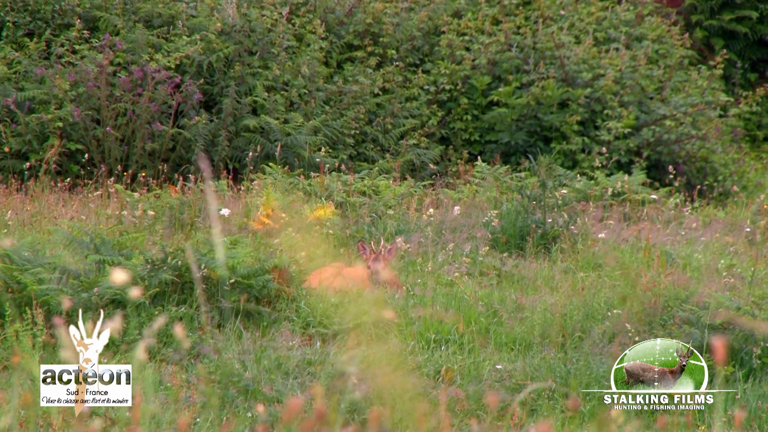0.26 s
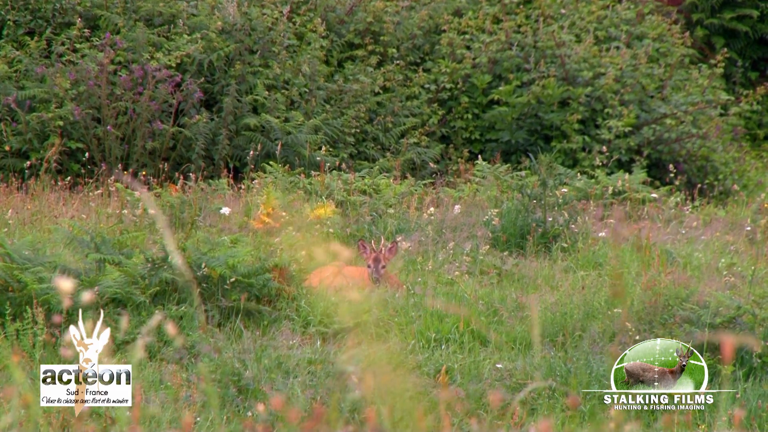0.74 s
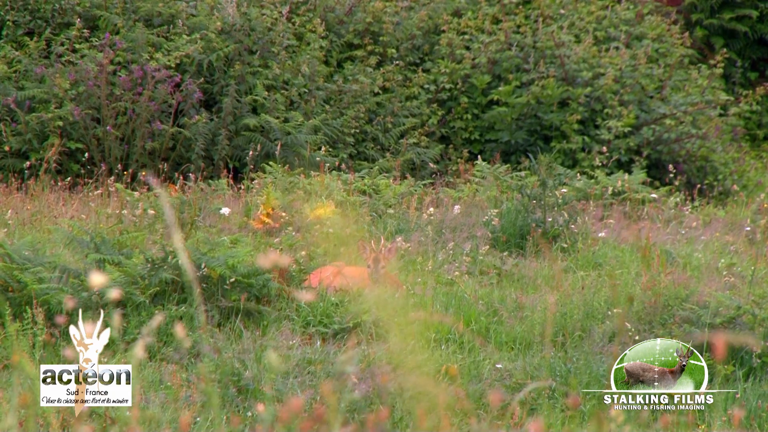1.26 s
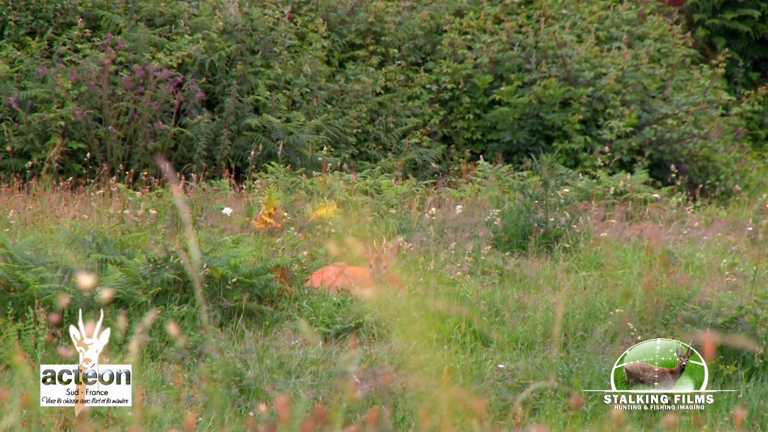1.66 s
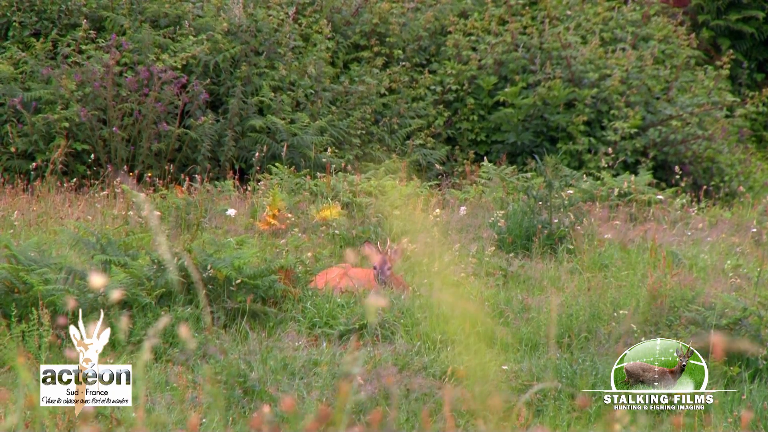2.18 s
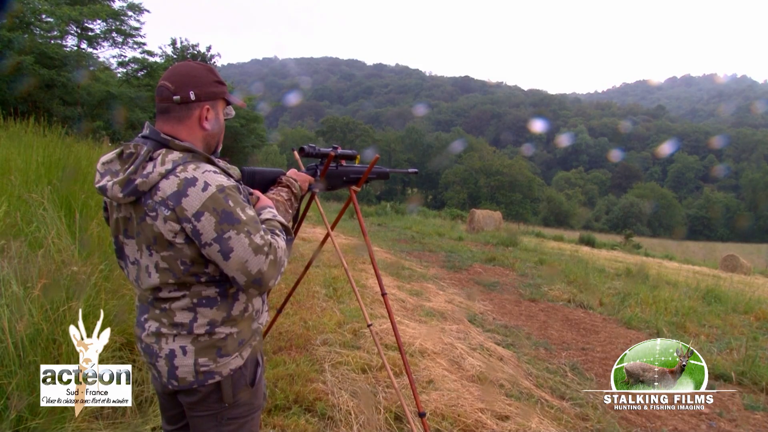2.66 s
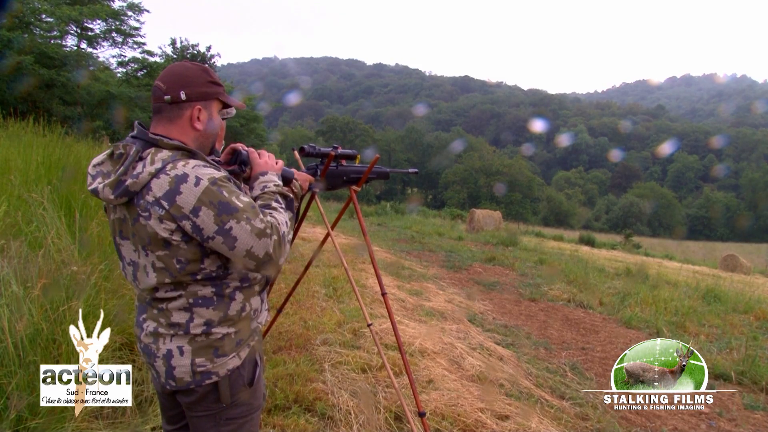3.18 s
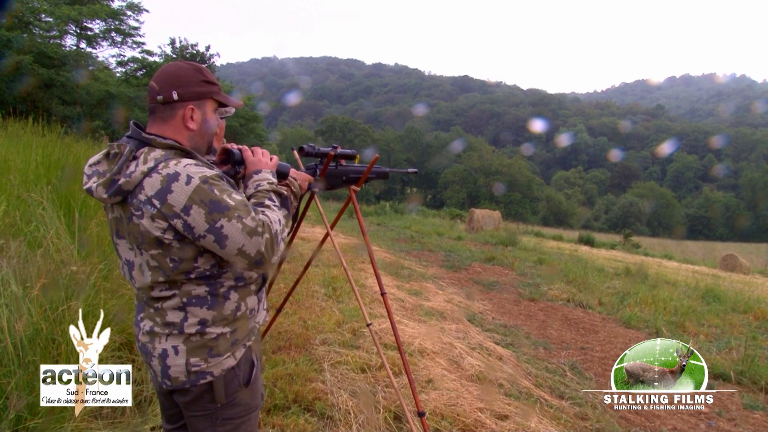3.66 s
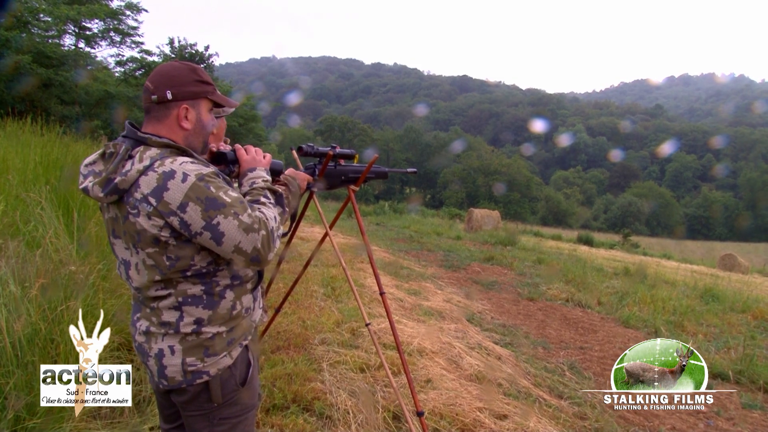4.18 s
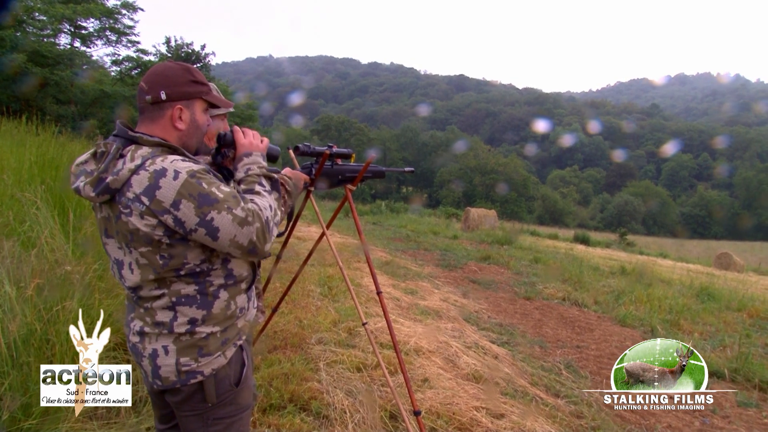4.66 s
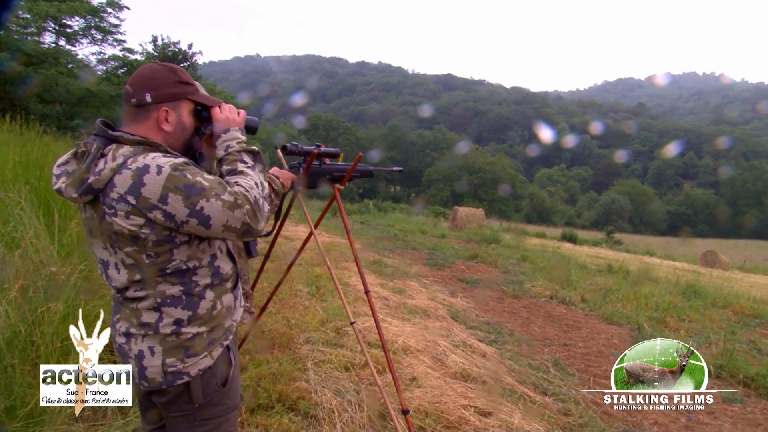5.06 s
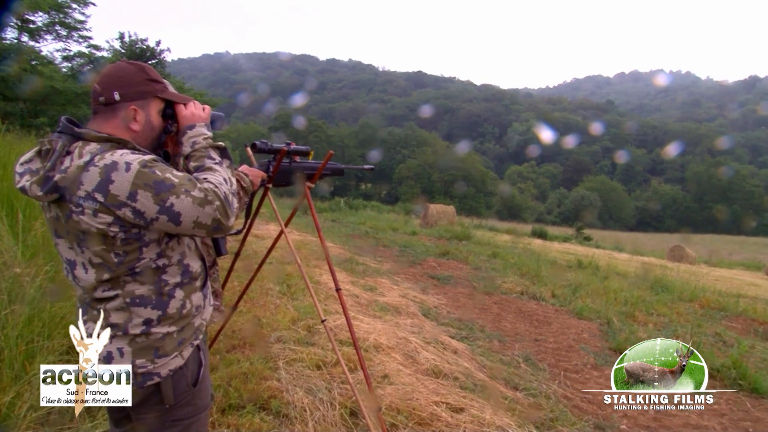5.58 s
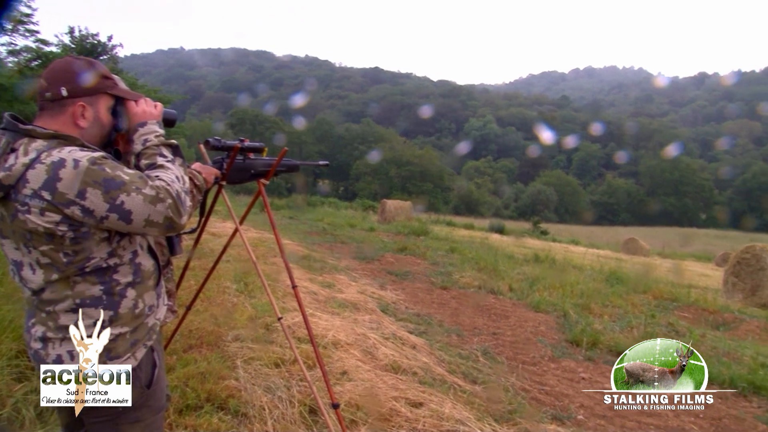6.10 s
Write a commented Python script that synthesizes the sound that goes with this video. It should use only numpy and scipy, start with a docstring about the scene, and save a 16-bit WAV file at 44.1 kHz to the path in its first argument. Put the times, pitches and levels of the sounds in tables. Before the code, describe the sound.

A deer barks twice in a meadow, then faint birds, soft drips and small knocks carry on over a low hush.

```python
"""A roe deer barks twice across a damp meadow while a warbler sings. Its vocal folds vibrate at a slow and
a fast rate at once; the two mix into extra tones over hoarse throat noise, shaped by one swell of effort.
Then the scene changes to a quieter field edge with far birds, one mewing call and soft knocks.
Drips, a small motor close by and a low hush of air are heard in both places."""
import sys
import numpy as np
from scipy import signal
from scipy.fft import rfft, irfft, next_fast_len
from scipy.io import wavfile

SR = 44100
rng = np.random.default_rng(int(sys.argv[2]) if len(sys.argv) > 2 else 0)


def dump(signal):
    """Clip the signal to [-1, 1] and save it as 16-bit WAV at the path in sys.argv[1]."""
    limited = np.clip(np.atleast_2d(signal).T, -1, 1)
    pcm = np.round(limited * 32767).astype(np.int16)
    wavfile.write(sys.argv[1], SR, pcm)


N = 279594
T = np.arange(N) / SR
FIELD_EDGE_S = 2.425  # the meadow gives way to the field edge
GRUNT_S, ATTACK_S = .06, .018  # each bark opens with a closed-mouth grunt, then a quick rise

# The barks, the first already under way: t/s, length/s, level/dB, slow fold f/Hz, fast fold f/Hz,
# hoarseness/dB, its change as effort goes/dB, closing fade/dB
DEER_BARKS = [(-.06, 0.25, -24, 288.8, 498, 0.5, -15, -5), (1.01, 0.28, -25, 280.6, 444.4, 2, -11.5, -3.5)]
def deer(echo_s=.03, ear_lag_s=7e-5):
    """Both barks reach the left ear first and brighter; the slope behind the deer sends back one echo."""
    voice = np.zeros(N)
    for index, (s, *_) in enumerate(DEER_BARKS):
        add(voice, s - ATTACK_S - GRUNT_S, bark(index))
    voice *= np.sin(np.pi / 2 * np.minimum(T / .004, 1)) ** 2  # fade in without a click
    voice = signal.sosfilt(signal.butter(4, 140, "high", fs=SR, output="sos"), voice)
    voice = voice + amp(-18) * np.interp(T - echo_s, T, voice, left=0)
    low = signal.sosfiltfilt(signal.butter(2, 1100, fs=SR, output="sos"), voice)
    left, right = pan(low, -1.5) + pan(voice - low, 3.9)
    direct = np.array([left, np.interp(T - ear_lag_s, T, right)])
    return direct + woods(voice, fade_s=0.98, level_db=-41.5)


def bark(index, jitter=0.011, waver=0.007, throb_db=0.8):
    """Two unsteady fold vibrations make tones, and the breath noise pulses with the slow one."""
    shape = bark_shape(index)
    size = shape["size"]
    slow, fast = (phase_of(hz * (1 + jitter * band(0, 110, size) + waver * band(0, 22, size)))
                  for hz in (shape["slow_hz"], shape["fast_hz"]))
    tones, tone_power = fold_tones(shape, index, slow, fast)
    breath, breath_power = hoarse_breath(shape, index)
    noise = breath + rasp(shape, slow, fast)
    puffs = unit((1 + 0.12 * np.cos(slow)) * amp(throb_db * band(0, 210, size)))
    voice = (tones + noise * puffs) / np.sqrt(tone_power + breath_power)
    ring = amp(-22.5) * ringing_air(shape["ring_hz"], 45, size)  # keeps ringing as the voice dulls
    return (voice + ring) * amp(shape["level_db"]) * signal.windows.tukey(size, .015)


# One swell of effort per bark: peak t/s into the bark, rise/s, fall/s, slow fold's fade as effort goes/dB
EFFORT_SWELLS = [(.058, .11, 0.1525, -32), (.088, .088, .13, -3.5)]
def bark_shape(index, fade_s=.04, release_s=.016, tail_s=.018, closed_hz=236.4, open_hz=456.2):
    """How a bark moves: as effort ebbs the pitch sinks and the voice dulls; a closed mouth muffles it."""
    _, length, db, slow_hz, fast_hz, hoarse_db, clear_db, fade_db = DEER_BARKS[index]
    peak_s, rise_s, fall_s, slow_fade_db = EFFORT_SWELLS[index]
    steps_s = [-ATTACK_S - GRUNT_S, GRUNT_S, ATTACK_S, length - fade_s, fade_s, release_s, tail_s]
    stages = np.cumsum(steps_s)
    t = np.arange(stages[0], stages[-1], 1 / SR)
    effort = swell(t - peak_s, rise_s, fall_s, flatness=2.5)
    slack = 1 - effort
    closed = np.clip(-t / ATTACK_S - .5, 0, 1)  # 1 while the mouth is shut
    return dict(
        size=len(t),
        level_db=db + np.interp(t, stages, [-39.5, -20, 0, 0, fade_db, fade_db - 13.5, -39.5]),
        slow_hz=slow_hz * (1 - .2 * slack),
        fast_hz=fast_hz * (1 - .04114 * slack ** 2),
        ring_hz=1126 * (1 - .049 * slack ** 2),
        mouth_hz=closed * closed_hz + (1 - closed) * (open_hz + 80 * effort),
        slow_fade_db=slow_fade_db * slack ** 2,
        lowest_fade_db=-18 * slack ** 2 * (t > peak_s),
        hoarse_db=hoarse_db + clear_db * slack + 10.5 * closed,
        db_per_octave=-1.5 - 4 * slack - 10 * closed)


def mouth(shape, hz, boost_db=4.5, width_hz=45):
    """The mouth boosts sound near its resonance (the pitch it rings at) and weakens sound far from it."""
    lift_db = boost_db / (1 + ((hz - shape["mouth_hz"]) / width_hz) ** 2)
    return amp(lift_db + shape["db_per_octave"] * np.abs(np.log2(hz / shape["mouth_hz"])))


# Tones of the folds: slow multiple, fast multiple, relative level/dB in bark 1, the same in bark 2
FOLD_TONES = [(1, 0, -9, -4), (0, 1, -1.5, -1), (2, 0, -9.5, 0), (1, 1, -9, -7.5), (0, 2, -24.5, -28.5),
              (1, 2, -2, -17.5), (3, 1, -26.5, -6), (2, 1, -25, -22.5), (4, 1, -38, -25)]
def fold_tones(shape, index, slow, fast, shimmer_db=1.35):
    """The folds mix into tones at m times the slow rate plus n times the fast. Gives sound and power."""
    tones, power = 0, 0
    for m, n, *db in FOLD_TONES:
        # odd multiples of the slow fold die first, and the lowest tone fades further
        fade_db = shape["slow_fade_db"] * (m % 2) + shape["lowest_fade_db"] * (m == 1 and n == 0)
        gain = amp(db[index] + fade_db) * mouth(shape, m * shape["slow_hz"] + n * shape["fast_hz"])
        shimmer = amp(shimmer_db * band(0, 100, shape["size"]))
        tones += gain * shimmer * np.sqrt(2) * np.sin(m * slow + n * fast)
        power += gain ** 2
    return tones, power


UPPER_HOARSE_SHARE = .55  # higher resonances follow only this share of the hoarseness
# Throat resonances: f/Hz, width/Hz, relative level/dB in bark 1, the same in bark 2
THROAT_RESONANCES = [(184.8, 190, -19, -19), (348.2, 85, -16, -12.5), (556.4, 100, -4, -6),
                     (641, 120, -7.5, -12.5), (815, 58, -20.5, -14.5), (1119, 190, -21, -10),
                     (1251, 68, -8, -8.5)]
def hoarse_breath(shape, index, low_below_hz=950, base_pitch_hz=279):
    """Rushing air rings in the throat, whose low resonances follow the pitch. Gives sound and power."""
    noise, power = 0, 0
    for hz, width_hz, *db in THROAT_RESONANCES:
        low = hz < low_below_hz
        centre_hz = hz * (shape["slow_hz"] / base_pitch_hz) ** 0.593 if low else hz
        hoarse_db = shape["hoarse_db"] * (1 if low else UPPER_HOARSE_SHARE)
        gain = amp(db[index] + hoarse_db) * mouth(shape, centre_hz)
        noise += gain * ringing_air(centre_hz, width_hz, shape["size"])
        power += gain ** 2
    return noise, power


# High throat resonances that make the barks rasp: f/Hz, width/Hz, relative level/dB
RASP_RESONANCES = [(1535, 82, -28), (1672, 42, -31), (2078, 90, -31.5), (2285, 120, -27.5), (2460, 79, -33),
                   (2746, 150, -29), (2880, 250, -33), (6040, 1400, -54)]
def rasp(shape, slow, fast, buzz_db=3):
    """Breath noise plus a buzz of high fold tones, each sounding as it slides through a resonance."""
    out = 0
    slow_hz, fast_hz = shape["slow_hz"], shape["fast_hz"]
    change_db = shape["hoarse_db"] * UPPER_HOARSE_SHARE + shape["slow_fade_db"] / 2
    for hz, width_hz, db in RASP_RESONANCES:
        buzz = sum(bell(m * slow_hz + n * fast_hz, hz, width_hz) * np.sin(m * slow + n * fast)
                   for m in range(10) for n in (1, 2))
        breath = ringing_air(hz, width_hz, shape["size"])
        out += amp(db + change_db) * mouth(shape, hz) * (breath + amp(buzz_db) * buzz)
    return out


def ringing_air(hz, width_hz, size):
    """Swirling air rings in one resonance, which may move in pitch."""
    phase = phase_of(hz + np.zeros(size))
    return band(0, width_hz, size) * np.sin(phase) + band(0, width_hz, size) * np.cos(phase)


# The warbler's opening notes: t/s, length/s, middle f/Hz, glide/octaves, bend/octaves, level/dB
OPENING_NOTES = [(.72, 0.059, 2850, -0.055, -0.084, -62), (.762, 0.04, 2797, -0.15, 0.013, -54.5),
                 (.903, 0.031, 2743, -0.2, -0.055, -56.5), (1.036, 0.045, 2824, 0.08, 0.025, -51.5),
                 (1.228, .15, 3517, -.015, -0.046, -58.5), (1.432, 0.089, 3667, -0.1, -0.03, -61),
                 (1.59, 0.1, 3050, -0.14, 0.18, -58)]
# Its refrain, a high falling note and a lower two-note answer: same columns, t/s into each round
REFRAIN_NOTES = [(0, 0.058, 3453, -0.364, 0.013, -58.5), (.14, 0.046, 2790, 0.133, 0.054, -53.5),
                 (.184, 0.0465, 2990, -.1, -.02, -57.5)]
def warbler(refrain_s=1.749, round_s=0.308, climb=0.0197):
    """A whistled opening, then three rounds whose first note is a little higher each time."""
    notes = list(OPENING_NOTES)
    for k in range(3):
        for note, (s, length, hz, *rest) in enumerate(REFRAIN_NOTES):
            lift = 1 + climb * k if note == 0 else 1
            notes.append((refrain_s + k * round_s + s, length, hz * lift, *rest))
    return whistles(notes, waver=0.0062)


CHIP_GAP_S = 0.04  # from one chip to the next
# Starts of a small bird's groups of three chips: t/s
TRIPLE_STARTS = [0.22, 0.608, 1.014, 1.411, 1.838, 2.274]
def meadow_birds():
    """The warbler and faint chips in threes, echoing among the trees."""
    song = warbler()
    triples = chips([s + k * CHIP_GAP_S for s in TRIPLE_STARTS for k in range(3)], db=-80)
    return pan(song, 1.8) + triples + woods(song + triples / 2, fade_s=0.61, level_db=-3.5)


def chips(times, db, chip_hz=4420, length_s=.026):
    """A small bird's short, high, falling notes, each a little different in pitch and level."""
    notes = [(s, length_s, chip_hz * (1 + 0.0098 * detune), -.16, 0, db + 2 * louder)
             for s, (detune, louder) in zip(times, rng.standard_normal((len(times), 2)))]
    return whistles(notes, waver=0.038)


def whistles(notes, waver):
    """Bird notes: nearly pure tones that swell and fade while gliding along a bent line of pitch."""
    out, wander = np.zeros(N), 1 + waver * band(0, 170)
    for s, length, middle_hz, glide, bend, db in notes:
        progress = np.linspace(0, 1, int(length * SR))
        hz = middle_hz * 2 ** (glide * (progress - .5) - bend * (2 * progress - 1) ** 2)
        hz *= wander.take(int(s * SR) + np.arange(len(hz)), mode="wrap")
        loudness = amp(db) * np.abs(np.sin(np.pi * progress)) ** 0.8
        add(out, s, loudness * np.sqrt(2) * np.sin(phase_of(hz)))
    return out


# Tones that make up the mewing call: multiple of the pitch, relative level/dB
MEW_TONES = [(1, -5.5), (2, -7.5), (3, -3.5), (4, -13.5), (5, -32), (6, -35)]
def mewing(start_s=3.852, length_s=0.266, low_hz=1750, lift_hz=169, db=-64):
    """One call scoops up with a scratch, then a swell of effort lifts and drops its pitch and level."""
    t = T - start_s
    effort = swell(t - 0.064, rise_s=.14, fall_s=.14)
    catch = np.exp(-np.abs(t) / .012)  # the voice starts flat and scratchy
    unsteady = (0.0018 + .04 * catch) * band(0, 300) - .07 * catch
    phase = phase_of((low_hz + lift_hz * effort) * (1 + unsteady))
    gate = np.clip(np.minimum(t, length_s - t) / 0.0067, 0, 1)
    tone = sum(amp(tone_db) * np.sqrt(2) * np.sin(k * phase) for k, tone_db in MEW_TONES)
    return tone * gate * amp(db - 13 * (1 - effort) ** 2)


# The clearest far whistles: t/s, length/s, middle f/Hz, glide/octaves, level/dB
FAR_NOTES = [(2.72, 0.094, 2750, -0.1, -81), (2.836, 0.14, 2720, -0.19, -82),
             (3.276, .12, 2112, -0.1, -72.5), (3.412, 0.074, 3180, -0.2, -81.5),
             (3.544, 0.14, 2665, 0.082, -76.5), (3.58, 0.081, 2280, 0.13, -74),
             (4.002, 0.049, 2313, -0.14, -72.5), (4.267, 0.06, 2270, -0.48, -74),
             (4.385, 0.094, 1974, 0.02, -79), (4.523, 0.066, 2280, 0.071, -74.5),
             (4.806, 0.076, 3190, 0.47, -86.5), (5.04, 0.06, 2920, -0.13, -83),
             (5.802, 0.072, 3250, 0.44, -84)]
def field_birds(chip_count=102, bend=0.031):
    """Far song blurred by the trees, one mewing call and a steady twitter of chips."""
    song = whistles([(*note, bend, db) for *note, db in FAR_NOTES], waver=0.01) + chorus()
    beats = np.arange(chip_count) + 0.23 * rng.standard_normal(chip_count)
    twitter = chips(FIELD_EDGE_S + beats * CHIP_GAP_S, db=-84)
    mew = mewing()
    return (pan(song, 14) + woods(song, fade_s=0.32, level_db=6)
            + twitter + woods(twitter, fade_s=0.16, level_db=-0.5)
            + pan(mew, 1) + woods(mew, fade_s=0.057, level_db=-1.5))


def chorus(count=24, db=-80, start_s=2.6, span_s=1.7, low_hz=1500, octaves=0.81):
    """Many far birds whistle random glides that run together."""
    notes = [(start_s + span_s * when, .09, low_hz * 2 ** (octaves * height), .612 * (slope - .5), 0, db)
             for when, height, slope in rng.random((count, 3))]
    return whistles(notes, waver=0.015)


# The loudest drips close by: t/s, level/dB, ring f/Hz
NEAR_DRIPS = [(0.267, -50.5, 2900), (1.451, -44, 1180), (2.461, -39, 663), (2.694, -42, 1260),
              (3.236, -46.5, 1400), (3.426, -48, 970), (3.715, -50.5, 1510), (3.965, -47, 1470),
              (4.377, -48.5, 1320), (4.534, -53, 2100), (4.755, -54.5, 2200), (4.969, -48, 939),
              (2.26, -49, 3300), (5.136, -50, 1670), (5.178, -47.5, 1690), (5.191, -49, 2290),
              (5.281, -59, 1880), (5.354, -56, 2000), (5.743, -51, 1460)]
def drips(faint_count=260, faint_db=-60, faint_hz=1800, meadow_share=0.4):
    """Drops hit cloth and grass with a tap, a short ring, a splash and a click; most are faint."""
    out, t = np.zeros((2, N)), T[:SR // 16]
    drops = [(s, db - 0.5, hz) for s, db, hz in NEAR_DRIPS]
    times = np.interp(rng.random(faint_count), [0, meadow_share, 1], [0, FIELD_EDGE_S, T[-1]])
    drops += [(s, faint_db + 4 * np.clip(louder, -2, 1.2), faint_hz * 2 ** np.clip(higher / 2, -2, 1))
              for s, (louder, higher) in zip(times, rng.standard_normal((faint_count, 2)))]
    for s, db, hz in drops:
        splash = amp(-13) * lowpass(rng.standard_normal(len(t)), 2 * hz) * np.exp(-t / .002)
        click = amp(-16) * min(hz / faint_hz, 1) * tap(5200, cycles=.5)
        drop = tap(hz, cycles=0.28) + amp(-9) * tap(hz, cycles=2) + splash + click
        for channel, x in zip(out, pan(amp(db) * drop, 3 * rng.standard_normal())):
            add(channel, s, x)
    return lowpass(out, 7500, order=4)


# Knocks of hands on gear: t/s, level/dB, lower ring f/Hz
HAND_KNOCKS = [(4.513, -53, 1400), (4.641, -53, 200), (5.162, -51, 1260), (5.208, -49.5, 213),
               (5.281, -51.5, 380), (5.327, -52, 224), (5.484, -53.5, 216), (5.652, -52, 1190)]
def knocks(upper_ratio=1.29, cycles=2.3):
    """Hands bump the gear, and each bump sets off two short rings."""
    out = np.zeros(N)
    for s, db, hz in HAND_KNOCKS:
        add(out, s, amp(db) * (tap(hz, cycles) + tap(hz * upper_ratio, cycles)) / 2)
    return out


def tap(hz, cycles):
    """A struck thing rings briefly, falling to about a third after the given number of cycles."""
    t = T[:SR // 16]
    ring = np.sin(2 * np.pi * hz * t) * np.exp(-hz * t / cycles)
    return ring / np.abs(ring).max()


def small_motor():
    """A motor chatters softly in the meadow; near the end its even ticks ring its housing."""
    chatter = tick_pulses(.26, 2.42, rate_hz=16.3, uneven=.23, decay_s=.0065) + .47 * (T < FIELD_EDGE_S)
    whirr = (amp(-68.5) * band(330, 74) + amp(-66.5) * band(580, 400)
             + amp(-70.5) * band(1060, 88) + amp(-77.5) * band(1600, 350))
    ticks = tick_pulses(5.784, 6.34, rate_hz=25, uneven=.02, decay_s=.0035)
    low_ring = amp(-61) * np.sin(2 * np.pi * 320 * T) + amp(-71) * np.sin(2 * np.pi * 215 * T)
    housing = np.sqrt(2) * low_ring + amp(-64.5) * band(1145, 300) + amp(-72) * band(580, 500)
    return chatter * whirr + ticks * housing


def tick_pulses(start_s, end_s, rate_hz, uneven, decay_s):
    """The loudness of repeated ticks, each a little off in time and strength."""
    out, t = np.zeros(N), T[:SR // 16]
    pulse = t / decay_s * np.exp(1 - t / decay_s)
    for k, (late, stronger) in enumerate(rng.standard_normal((64, 2))):
        s = start_s + (k + uneven * late) / rate_hz
        if s < end_s:
            add(out, s, (1 + uneven * stronger) * pulse)
    return out


# Tone colour of the background air: f/Hz, relative level/dB
AIR_COLOUR = [(25, -2), (100, -2), (400, -7.5), (800, -13), (1400, -15), (2000, -23), (2600, -19),
              (3600, -28), (6500, -33), (9000, -41), (15600, -42.5)]
def air(db=-68, flicker_db=3):
    """A hush of air, alike in both ears in the bass and wider in the treble; its low part flickers."""
    f = np.arange(N // 2 + 1) * SR / N + 1
    hz, colour_db = np.transpose(AIR_COLOUR)
    colour = amp(np.interp(np.log(f), np.log(hz), colour_db))
    width = amp(np.interp(np.log(f), np.log([600, 2000]), [-16, -6]))
    mid = irfft(rfft(rng.standard_normal(N)) * colour, N)
    side = irfft(rfft(rng.standard_normal(N)) * colour * width, N)
    hush = amp(db) * pan(np.array([mid + side, mid - side]) / np.std(mid), -0.4)
    return hush + lowpass(hush, 1100) * (amp(flicker_db * band(0, 22)) - 1)


def woods(x, fade_s, level_db):
    """Trees scatter a sound into a blurred echo, different in each ear, that falls 60 dB in fade_s."""
    t = T[:SR]
    tail = rng.standard_normal((2, SR)) * amp(-60 * t / fade_s) * np.minimum(t / .02, 1)
    tail /= np.sqrt(np.sum(tail ** 2, axis=1, keepdims=True))
    return amp(level_db) * signal.fftconvolve(x[None], tail, axes=1)[:, :N]


def amp(db):
    """Turn decibels into a gain to multiply by."""
    return 10 ** (np.asarray(db) / 20)


def unit(x):
    """Scale a signal to an average power of 1."""
    return x / np.sqrt(np.mean(np.abs(x) ** 2) + 1e-30)


def bell(hz, centre_hz, width_hz):
    """A bell-shaped curve that is 1 at its centre."""
    return np.exp2(-2 * ((hz - centre_hz) / width_hz) ** 2)


def band(hz, width_hz, size=N):
    """Noise around one frequency; at 0 Hz it is a random wander."""
    n = next_fast_len(max(size, SR))
    f = np.arange(n // 2 + 1) * SR / n
    return unit(irfft(rfft(rng.standard_normal(n)) * bell(f, hz, width_hz), n))[:size]


def swell(t, rise_s, fall_s, flatness=2):
    """A rise and fall that reaches 1 at t = 0; more flatness gives a broader top."""
    return np.exp(-np.abs(t / np.where(t < 0, rise_s, fall_s)) ** flatness)


def phase_of(hz):
    """The running angle of a vibration whose frequency moves."""
    return 2 * np.pi * np.cumsum(hz) / SR


def lowpass(x, hz, order=2):
    """Soften everything above hz."""
    return signal.sosfilt(signal.butter(order, min(hz, SR / 2 - 1), fs=SR, output="sos"), x)


def pan(x, left_db):
    """Make a sound left_db louder in the left ear than in the right."""
    return x * amp(np.array([[left_db], [-left_db]]) / 2)


def add(out, s, x):
    """Mix a short sound in at s seconds; it may be under way at the start."""
    i = int(s * SR)
    x, i = x[max(-i, 0):], max(i, 0)
    out[i:i + len(x)] += x[:max(N - i, 0)]


def scene():
    """The meadow's animals give way to those of the field edge, over one shared background."""
    at_edge = np.clip((T - FIELD_EDGE_S) / .01, 0, 1)
    animals = (1 - at_edge) * (deer() + meadow_birds()) + at_edge * field_birds()
    return animals + air() + drips() + knocks() + small_motor()


def record(dry, top_hz=15700):
    """Cut off the highest treble."""
    return signal.sosfilt(signal.ellip(8, .2, 70, top_hz, fs=SR, output="sos"), dry)


dry = scene()
out = record(dry)
dump(out)
```